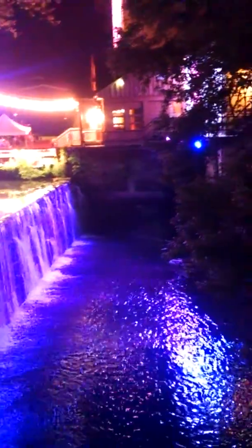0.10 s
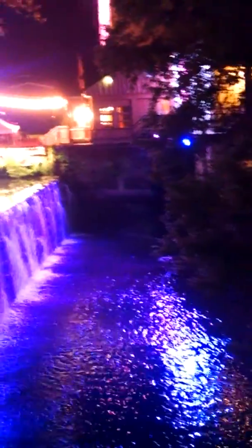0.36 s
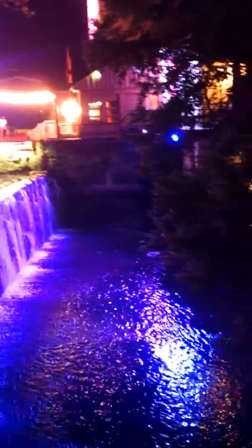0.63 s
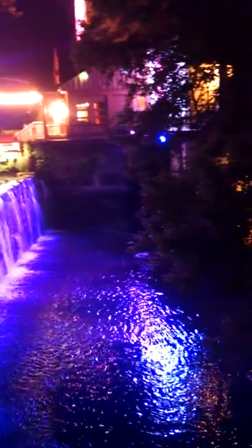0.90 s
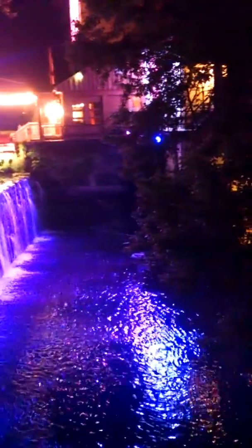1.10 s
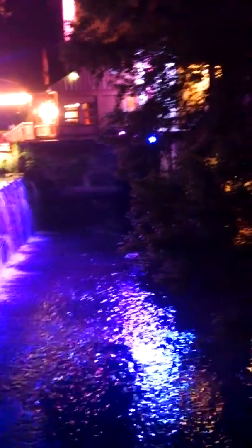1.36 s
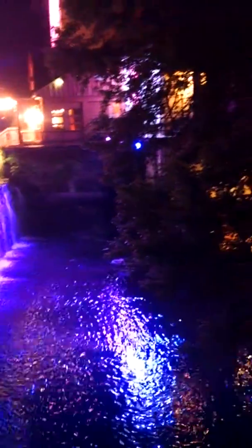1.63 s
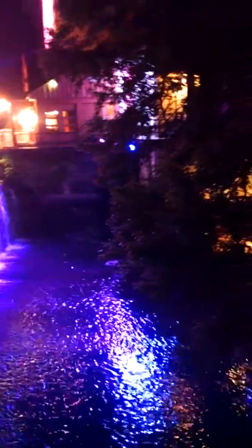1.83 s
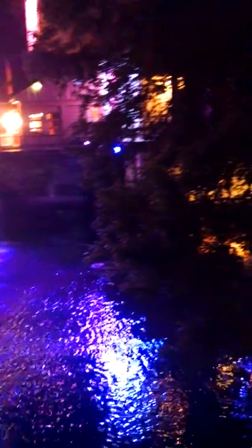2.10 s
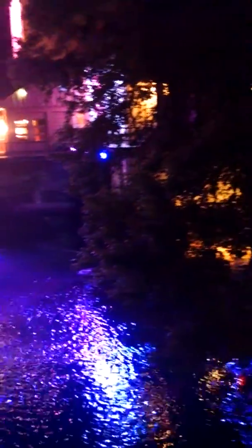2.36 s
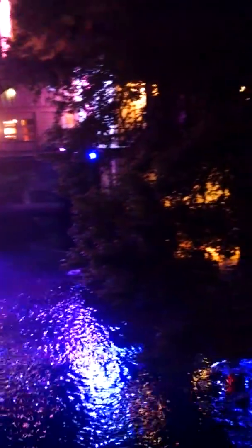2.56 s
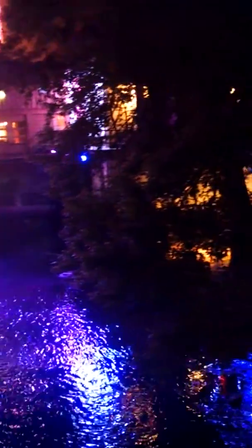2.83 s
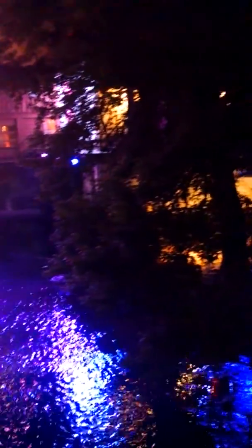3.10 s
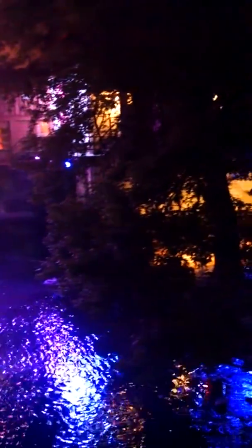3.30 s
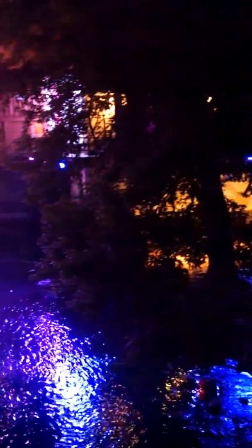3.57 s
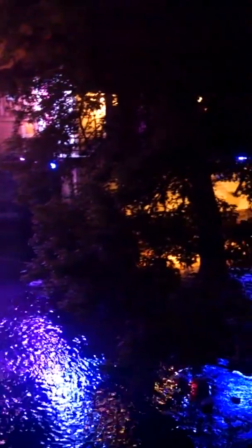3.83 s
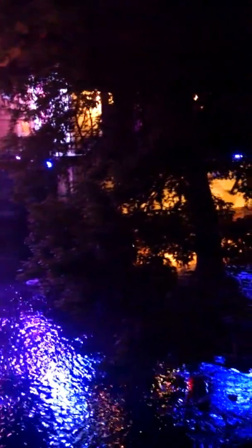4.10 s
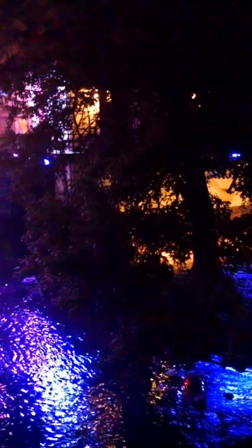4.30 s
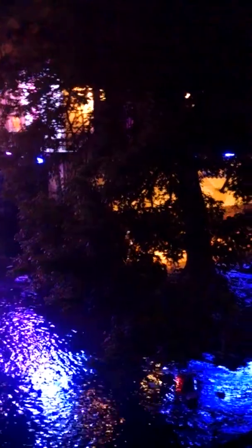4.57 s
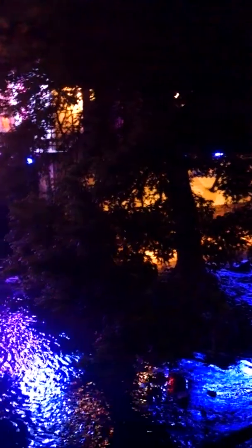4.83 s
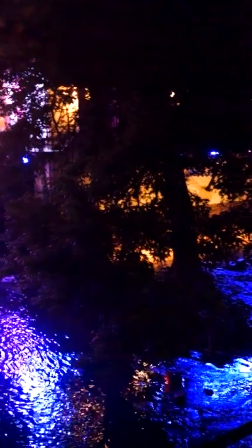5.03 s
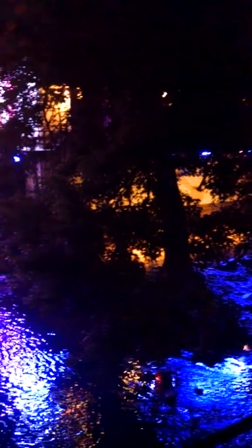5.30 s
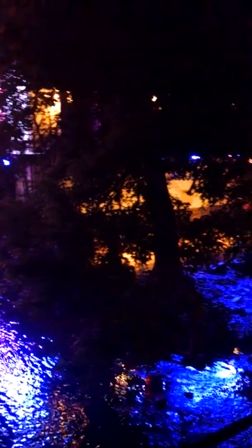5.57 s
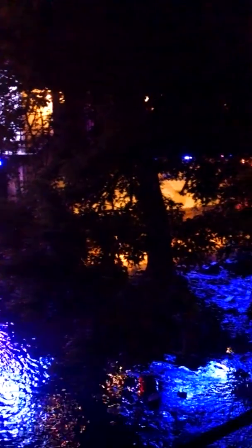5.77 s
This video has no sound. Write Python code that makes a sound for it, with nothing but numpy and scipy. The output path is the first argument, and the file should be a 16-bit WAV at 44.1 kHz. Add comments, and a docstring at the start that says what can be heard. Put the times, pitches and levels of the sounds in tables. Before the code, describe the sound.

Constant smooth waterfall roar outdoors, with a faint far-off motor speeding up underneath and a weak low hum coming and going.

```python
"""A wide sheet of water falls over a low weir, some metres from a hand-held phone at night: countless
bursting drops merge into a smooth bright hiss, made as shaped noise that reaches the right port first.
Far off an engine speeds up, made as sines at multiples of its firing rate that slide through fixed
resonances. A low hum comes and goes, made as single sines with soft edges."""
import sys
import numpy as np
from scipy import signal
from scipy.fft import rfft, irfft, next_fast_len
from scipy.io import wavfile
from scipy.ndimage import uniform_filter1d

SR = 44100
rng = np.random.default_rng(int(sys.argv[2]) if len(sys.argv) > 2 else 0)


def invert_db(level):
    """Linear amplitude ratio for a level in decibels (20 dB per decade), elementwise."""
    return 10 ** (np.asarray(level, dtype=float) / 20)


def materialize(psi):
    """Save the field psi as 16-bit PCM at rate SR to the path in sys.argv[1].

    A 1-D psi becomes a single channel; in a 2-D psi each row is a channel.
    """
    bounded = np.clip(np.atleast_2d(psi).T, -1, 1)
    quanta = np.round(bounded * 32767).astype(np.int16)
    wavfile.write(sys.argv[1], SR, quanta)


N = 261072  # length [samples]


def walk(rate_hz):
    """Low-pass random process: levels held for 1 / rate_hz, smoothed twice; spread near 1."""
    hold = int(SR / rate_hz)
    levels = rng.standard_normal(N // hold + 1)
    smooth = uniform_filter1d(np.repeat(levels, hold), hold)
    return 1.32 * uniform_filter1d(smooth, hold)[:N]


def fall(surge_db=0.32, flicker_db=0.76):
    """Incoherent sum of many bursts: shaped Gaussian noise, partly coherent between two spaced ports."""
    # Spray colour and stereo image: (frequency [Hz], relative spectral density [dB],
    # left minus right [dB], power share alike in both ports [0-1], extra lead of the right port [rad])
    spray_colour = [(25, -18, -8, .95, 0), (45, -8.5, -18, 0.8, 0), (129, -3, -6, 0.8, 0),
                    (370, -3, -7, 0.72, 0), (563, -0.5, -5, 0.78, 0), (824, -5, -3.5, 0.91, -0.59),
                    (1870, -11, 3.5, 1, 0.41), (2220, -7, -1, 1, 0.29), (3820, -8.5, 0, 0.84, -0.3),
                    (5470, -6.5, 0.5, 0.52, 0.2), (7200, -6.5, -3, 0.51, -0.15),
                    (10170, -5.5, -2, 0.94, -0.39), (12030, -0.5, -2.5, 0.9, -0.048),
                    (14200, 1, -1.3, 1, 0.11), (15100, 2, -1, 0.97, 0.52)]
    fall_db = -20.5  # mean of both ports from 3.2 to 15 kHz, before flicker and gain dips
    port_lag_s = 0.0003924  # extra travel time to the left port
    bass_lead_rad = -0.22  # lead of the right port in the bass: slightly behind
    size = next_fast_len(N)
    hz = np.maximum(np.arange(size // 2 + 1) * SR / size, 1)
    points, *columns = np.transpose(spray_colour)
    db, pan_db, alike, bend = (np.interp(np.log(hz), np.log(points), column) for column in columns)
    alike = np.clip(alike, 0, 1)

    direct, scattered = rfft(rng.standard_normal((2, size)))
    # the left port is later and upside down in the treble; the bass stays nearly in step
    lead = np.maximum(2 * np.pi * hz * port_lag_s - np.pi + bend, bass_lead_rad)
    shared = np.sqrt(alike) * direct * np.exp(-1j * lead)
    left = shared + np.sqrt(1 - alike) * scattered
    both = invert_db(db) * np.array([invert_db(pan_db) * left, direct])

    # half-octave bands surge together and flicker alone, more in the treble
    out, surge = 0, walk(30)
    for step in range(21):
        # overlapping slices that add up to one
        share = np.clip(1 - abs(2 * np.log2(hz / 20) - step), 0, 1)
        band = irfft(both * share, size)[:, :N]
        change_db = step / 20 * (surge_db * surge + flicker_db * walk(20.96))
        out = out + band * invert_db(change_db)

    treble = both[:, (hz > 3200) & (hz < 15000)].mean(axis=0)
    treble_power = np.sum(abs(treble) ** 2) * 2 / size ** 2  # mean square, by Parseval
    return out / np.sqrt(treble_power) * invert_db(fall_db) * recorder_gain_dips()


def recorder_gain_dips():
    """Gain modulation: the recorder's gain, applied to the fall, drops, holds, recovers exponentially."""
    # Brief dips of the gain at set times: (time [s], depth [dB], time from onset to recovery [s])
    gain_dips = [(.085, 2, 0.033), (2.43, 3, 0.076), (3.53, 1.8, 0.079), (4.5, 1.6, 0.046),
                 (4.85, 1.5, 0.076), (5.13, 2.5, 0.034), (5.76, 0.5, .03)]
    drop_s, recover_s = 0.015, 0.042
    s = np.arange(N) / SR
    depth_db = 0
    for at, db, held in gain_dips:
        onset = np.clip((s - at) / drop_s, 0, 1)
        recovery = np.exp(-np.maximum(s - at - held, 0) / recover_s)
        depth_db = depth_db + db * onset * recovery
    return invert_db(-depth_db)


def tone(hz, waver_hz):
    """Phase is the integral of frequency: a sine of rms 1 that follows a slightly wavering pitch."""
    cycles = np.cumsum(hz + waver_hz * walk(12)) / SR
    return np.sqrt(2) * np.sin(2 * np.pi * (rng.random() + cycles))


def engine(rough_db=2.36):
    """Source and filter: orders of a rising firing rate slide through resonances and wobble in the air."""
    # Engine orders: (multiple of the firing rate [1], relative level [dB], growth under load [dB/s])
    firing_orders = [(.5, -14.5, 3.5), (1, 2, 2.5), (1.5, -14.5, 5.5), (2, -8, 4.), (3, -22, 6.5)]
    # Resonances and dips of exhaust and path: (frequency [Hz], gain [dB])
    exhaust_response = [(60, 1.5), (128, 2), (150, -1.5), (164, -10), (171, 0), (181, 6), (196, -1),
                        (225, -3), (250, -9), (270, 2.5), (285, -3), (308, 1.5), (328, 4), (355, 1),
                        (400, -5), (600, -5)]
    engine_db = -50  # common level of the orders, mean of both ports
    # firing rate = idle_hz + pull_hz * (seconds since pulls_s) ** pull_power
    idle_hz, pulls_s, pull_hz, pull_power = 121, 1.2, 2.47, 2.2
    s = np.arange(N) / SR
    pulling = np.maximum(s - pulls_s, 0)
    firing_hz = idle_hz + pull_hz * pulling ** pull_power
    points, gains_db = np.transpose(exhaust_response)
    orders = 0
    for multiple, db, swell_db in firing_orders:
        hz = multiple * firing_hz
        resonance_db = np.interp(np.log(hz), np.log(points), gains_db)
        level_db = db + swell_db * pulling + resonance_db + rough_db * walk(15)
        orders = orders + invert_db(level_db) * tone(hz, 1.0)
    fade_in = np.clip(s / pulls_s, 0, 1) ** 2
    return fade_in * invert_db(engine_db) * orders


def hum(edge_s=0.053):
    """Gated pure tones: each low hum has linear edges, which soften its start and end."""
    # Stretches of hum: (start [s], end [s], pitch [Hz], level as the mean of both ports [dB])
    hum_stretches = [(-.1, .74, 46.2, -43.5), (1.3, 1.45, 47.6, -49), (2.05, 2.5, 53.4, -45),
                     (2.6, 3.2, 47.3, -45), (3.317, 4.13, 47.8, -40), (4.747, 5.0, 55.5, -48),
                     (5.3, 5.75, 53.7, -48), (5.697, 6.1, 57.4, -40)]
    s = np.arange(N) / SR
    out = 0
    for start, end, hz, db in hum_stretches:
        gate = np.clip(np.minimum(s - start, end - s) / edge_s, 0, 1)
        out = out + invert_db(db) * gate * tone(hz, 0.46)
    return out


def scene():
    """Superposition: the fall, with engine and hum louder at the right port by a level difference."""
    pan = invert_db([[-7], [0]])  # left and right [dB]
    return fall() + (engine() + hum()) * pan / pan.mean()


def band_limit(x):
    """A steep low-pass at the top of the band."""
    return signal.sosfilt(signal.butter(12, 15970, fs=SR, output="sos"), x)


def record(dry):
    """Band limiting: a steep elliptic low-pass in the phone cuts the top of the mix."""
    top_hz = 15460
    low_pass = signal.ellip(14, .2, 110, top_hz, fs=SR, output="sos")  # ripple, stop band [dB]
    mix = signal.sosfilt(low_pass, dry)
    return band_limit(mix)


dry = scene()
out = record(dry)
materialize(out)
```